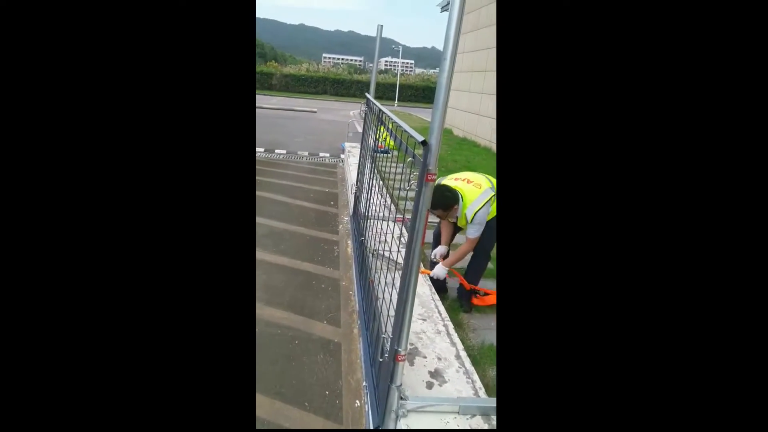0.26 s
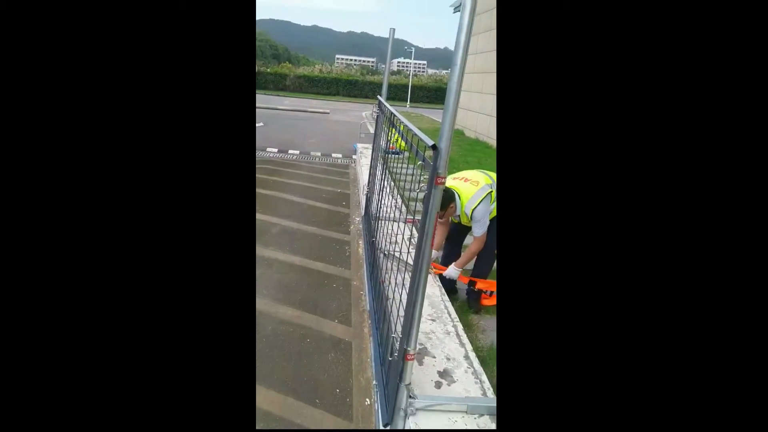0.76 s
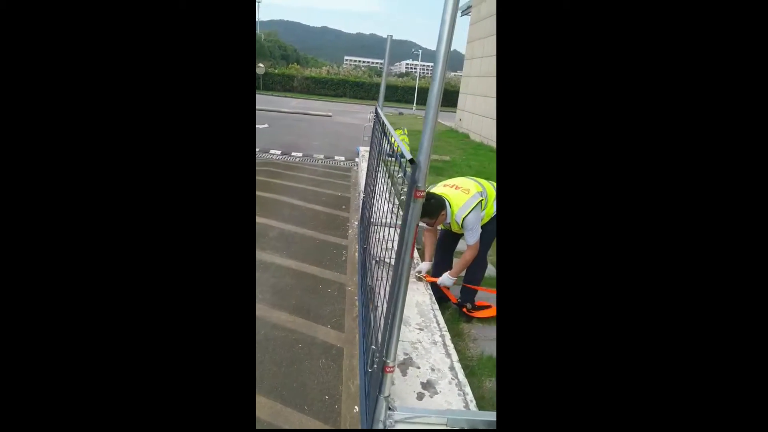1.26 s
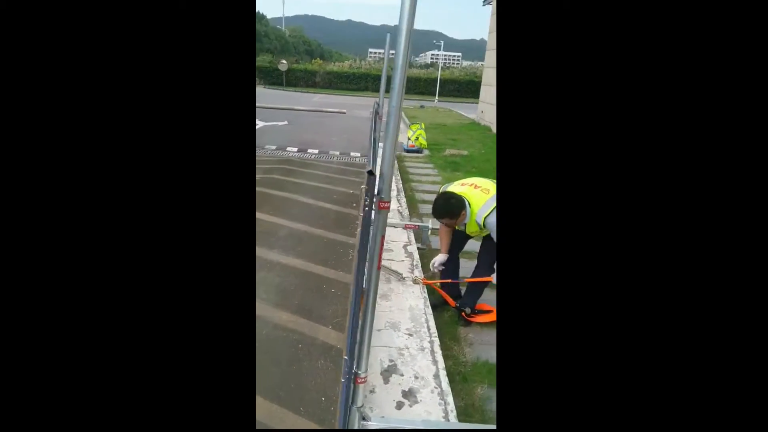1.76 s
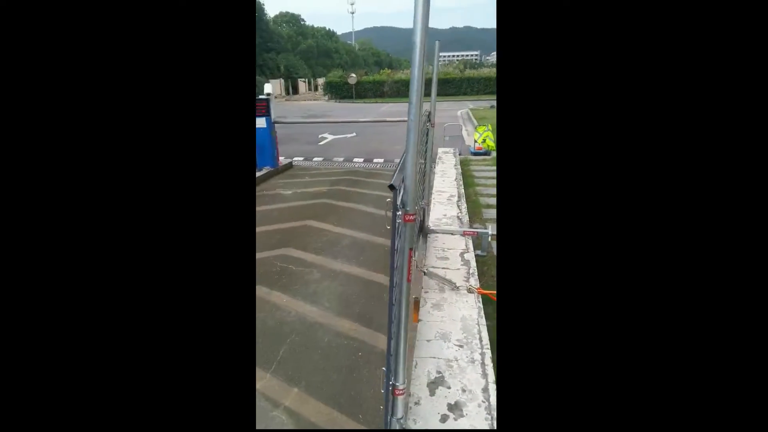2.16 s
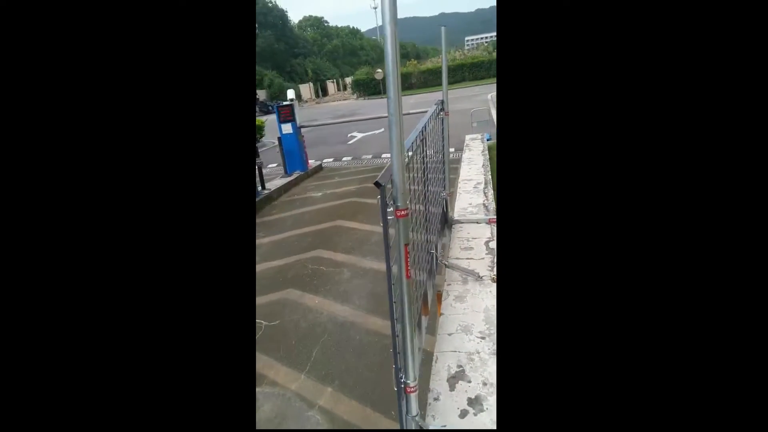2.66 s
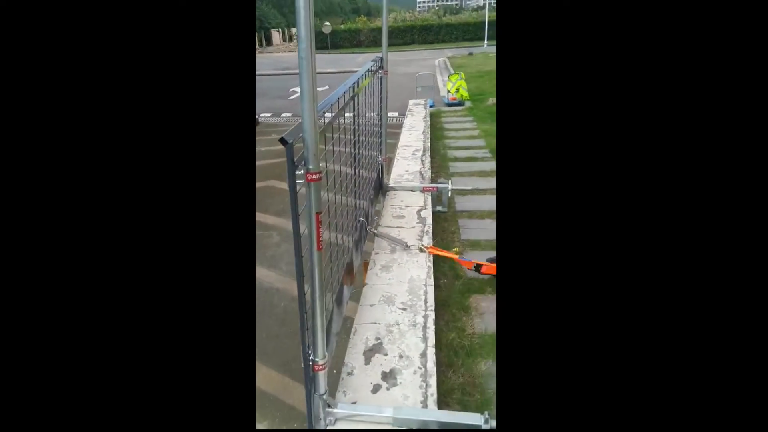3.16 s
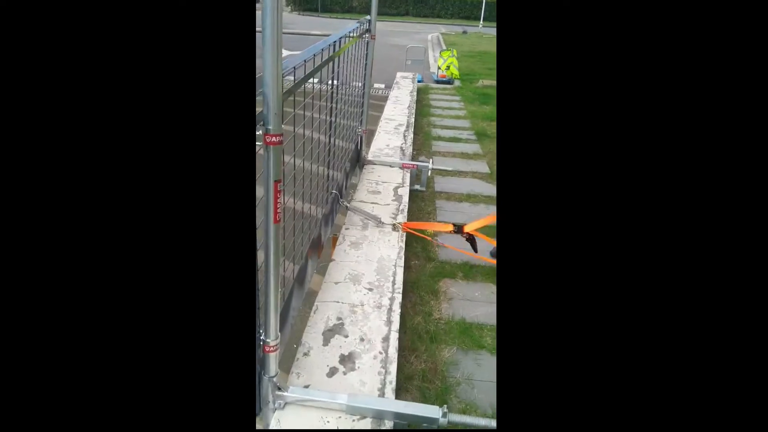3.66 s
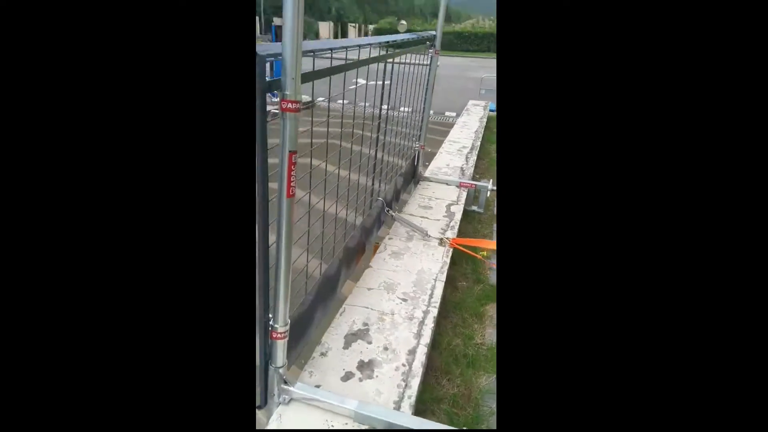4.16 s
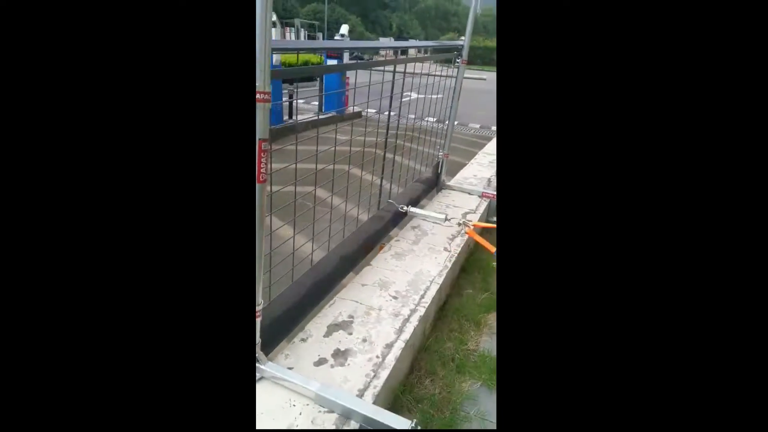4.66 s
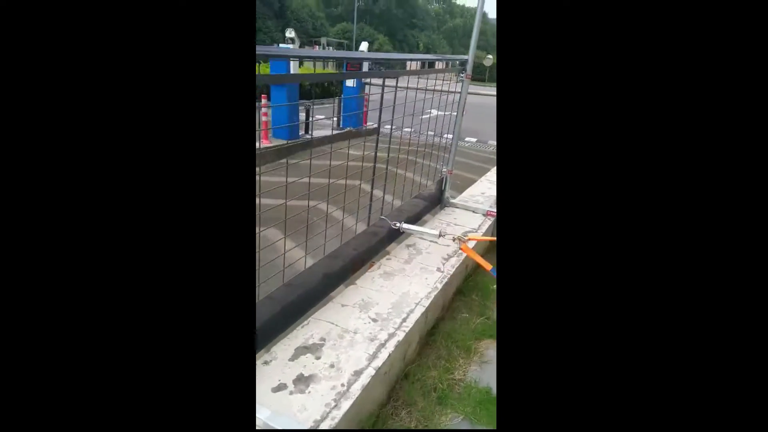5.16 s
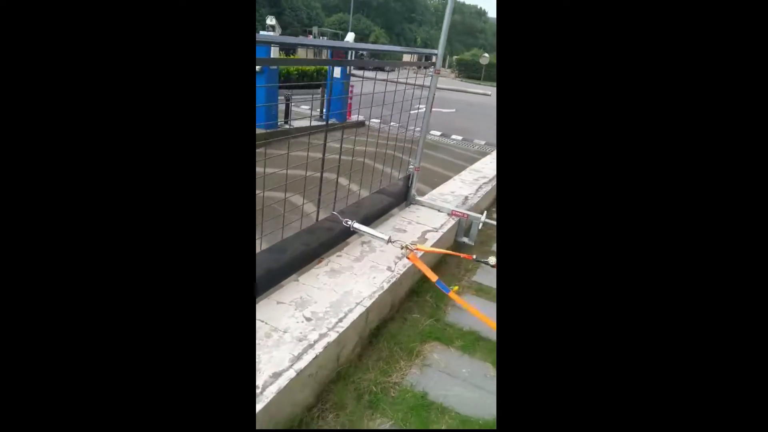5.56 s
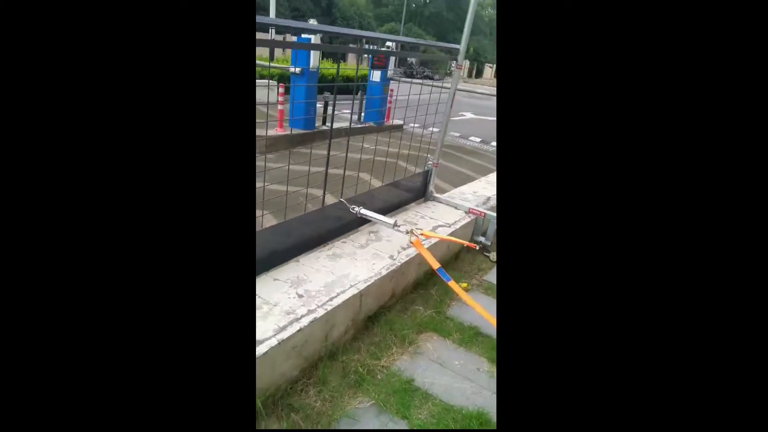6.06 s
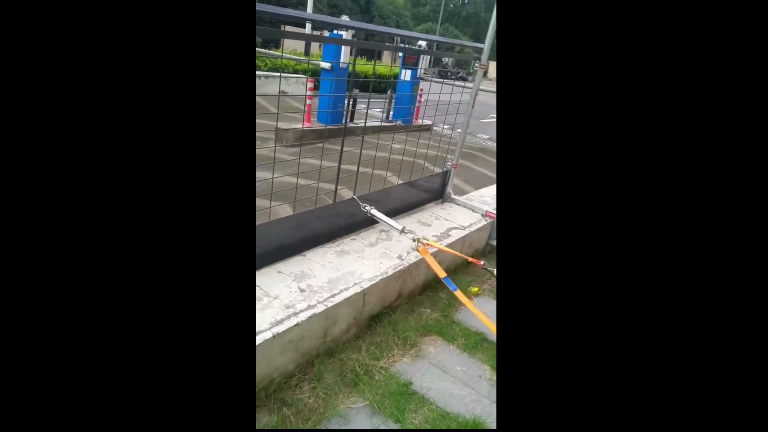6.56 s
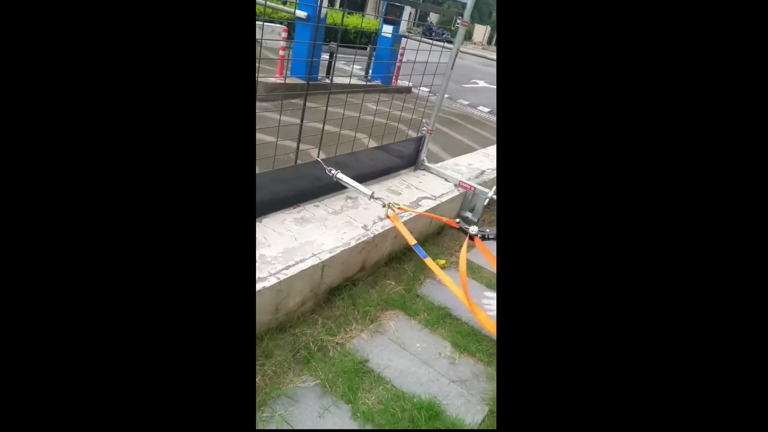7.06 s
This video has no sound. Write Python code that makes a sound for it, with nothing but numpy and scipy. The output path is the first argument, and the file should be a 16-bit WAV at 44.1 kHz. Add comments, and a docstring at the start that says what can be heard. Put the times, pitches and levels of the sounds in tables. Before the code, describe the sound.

Outdoors, booming wind gives way to one very loud metal ratchet clack, followed by light clinks, dull tube knocks, and rasping strap slides.

```python
"""Ratchet strap on a wire fence

A ratchet strap and its hooks are worked by hand against a wire fence outdoors, heard by a two-port microphone.
Steel blows are chattering contacts that ring clusters of modes and scatter; tubes and links give fading tones.
Webbing swishes as thin high noise with a rustle and ticking metal; grit scrapes as bands of bumpy noise.
Behind it lie lumpy low wind noise, single buffets on the right port and a faint, steady wash of far traffic."""
import sys
import numpy as np
from scipy import signal
from scipy.fft import rfft, irfft
from scipy.io import wavfile
from scipy.ndimage import uniform_filter1d

SR = 44100
rng = np.random.default_rng(int(sys.argv[2]) if len(sys.argv) > 2 else 0)


def generate_wav(sig):
    """Save sig (samples, or channels by samples) to the path in sys.argv[1] as 16-bit PCM at SR."""
    pcm = np.round(np.clip(np.atleast_2d(sig).T, -1, 1) * 32767).astype(np.int16)
    wavfile.write(sys.argv[1], SR, pcm)


N = 322795  # length in samples

# In all tables a positive left-right value favours the left; levels stand before panning.
# Far traffic: spectrum shape (frequency [Hz], relative level per Hz [dB])
TRAFFIC_SPECTRUM = [(12, -39.5), (20, -19), (49, 4.5), (79, -2), (182, -14.5), (356, -22), (922, -24.5),
                    (1710, -31.5), (2590, -39.5), (4290, -38.5), (5520, -44), (8390, -47), (11700, -50.5),
                    (13900, -77.5), (16000, -86)]
# Far traffic: likeness of the two ports (frequency [Hz], likeness [0 to 1])
TRAFFIC_LIKENESS = [(60, 1), (240, 0.99), (950, 0.51), (3770, 0.0), (15000, 0)]
# Far traffic: balance of the two ports (frequency [Hz], left-right [dB])
TRAFFIC_TILT = [(60, -0.5), (240, -3.5), (950, -5.5), (3770, -4), (15000, -0.5)]
TRAFFIC_DB = -51.5

# Wind: its underlying flow, joined by straight lines (time [s], level [dB], left-right [dB])
WIND_FLOW = [(0.0, -47, -28), (.04, -28, -30), (.32, -34, -33), (.5, -27, -37), (.57, -39, -35),
             (.8, -43.5, 7), (1.03, -32, -22), (1.18, -40.5, -12), (1.38, -49, -22), (1.67, -73, -5.5),
             (4.26, -62.5, 5.5), (4.38, -38, 9), (4.73, -38.5, 18), (4.82, -55.5, 14), (5.2, -61.5, 1.5),
             (5.48, -70, 18), (6.1, -48.5, -8), (6.3, -42.5, -20), (6.52, -46.5, 17), (6.82, -59.5, -9),
             (7.1, -46.5, -4.5), (7.32, -69, 1)]
# Wind: gusts on top of the flow (peak time [s], rise [s], fall [s], level [dB], left-right [dB])
GUSTS = [(0.241, 0.054, 0.22, -23, -33), (0.401, 0.021, 0.11, -38, -32), (0.609, 0.045, 0.11, -30, -30),
         (.88, 0.099, 0.16, -31, -13), (1.22, 0.07, 0.14, -24, -42), (1.429, 0.04, 0.14, -40, -9.5),
         (2.019, 0.076, 0.034, -42, -2), (2.14, 0.08, 0.17, -48.5, 26), (2.378, 0.074, 0.068, -45.5, -9),
         (2.53, .15, .1, -41, 8), (2.61, 0.092, 0.13, -44.5, -4), (2.85, 0.071, 0.19, -48.5, -2.5),
         (3.91, 0.1, 0.054, -44.5, -8.5), (4.459, 0.084, 0.073, -27, -19), (4.65, 0.075, 0.07, -35.5, 28.5),
         (5.3, .2, 0.14, -42.5, 5), (5.57, 0.078, 0.48, -43, -1), (6.219, 0.06, 0.066, -40, 14),
         (6.38, 0.19, 0.11, -29, -10), (6.63, 0.11, .05, -33.5, 1), (6.9, 0.047, 0.25, -28.5, -47.5)]
# Wind: spectrum shape (frequency [Hz], relative level per Hz [dB])
WIND_SPECTRUM = [(8.8, -53), (15, -31), (27, -56.5), (59, 17.5), (99, 4.5), (159, -0.5), (201, -15),
                 (300, -23), (427, -42), (600, -30.5), (780, -69.5), (1320, -120)]
# Wind: single buffets on the right port (time [s], level [dB], pitch [Hz], span [cycles])
BUFFETS = [(.006, -9.5, 94.4, 0.73), (0.096, -16.5, 127, 3.3), (0.248, -6.5, 94, 1.03),
           (0.349, -10, 108, 1.65), (0.44, -19.5, 213, 1.6), (0.501, -17, 75, 1.1),
           (0.867, -18.5, 115, 4.6), (1.213, -13, 216, 0.95), (1.229, -31, 88, 2.1),
           (6.281, -20, 102, 0.85), (6.378, -11, 90.7, 1.23), (6.911, -13.5, 98.3, 1.1),
           (6.999, -22.5, 99, 2.4)]

# Dull knocks in fence tubes (time [s], level [dB], pitch [Hz], left-right [dB], 60 dB decay [s])
TUBE_KNOCKS = [(0.363, -53.5, 608, -6, 0.13), (0.887, -50, 604, -14, 0.09), (1.115, -46.5, 898, -8.5, 0.19),
               (1.15, -51, 628, -9.5, 0.39), (1.903, -61, 608, -17.5, 0.27), (4.034, -62, 875, -10, 0.17),
               (4.16, -45.5, 1050, -19, 0.052), (4.366, -50.5, 861, -18.5, 0.39),
               (4.392, -52, 858, -15, 0.22), (4.509, -48.5, 1580, -19, .3), (4.515, -54.5, 1042, -14, 0.3),
               (4.887, -51, 627, -22, 0.21), (5.026, -52.5, 598, -14.5, 0.13), (5.185, -51, 1550, -20, 0.1),
               (5.555, -42.5, 1597, -14, 0.17), (5.185, -44, 830, -18, 0.079), (5.916, -61, 968, -11, 0.14),
               (6.663, -48, 617, -17, 0.2)]
# Light clinks of loose links (time [s], level [dB], lowest tone [Hz], its relative level [dB],
# second tone [Hz], its relative level [dB], left-right [dB], 60 dB decay [s])
CLINKS = [(0.0343, -50, 1540, -35, 3900, -32, -17, 0.32), (0.4902, -46, 1630, -33, 3700, -12, -21, 0.095),
          (1.234, -42.5, 2620, -24, 4120, -16, -17.5, 0.25),
          (3.246, -36.5, 2610, -15.5, 3840, -36, -16, 0.15),
          (3.8781, -58, 2200, -3.5, 4210, -17, -11.5, 0.093),
          (3.906, -63.5, 1890, -0.5, 4340, -21.5, -22.5, 0.24),
          (4.769, -36.5, 2670, -10.5, 3500, -23, -8, 0.16),
          (4.9309, -45.5, 2690, -8.5, 3930, -32, -15, 0.12), (5.089, -54, 2800, -5, 3400, -32, -23, 0.27),
          (5.1794, -49, 2320, -2, 4290, -13, -19, 0.13), (5.352, -32.5, 2870, -31, 3800, -39.5, -15, 0.074),
          (5.916, -43, 1566, -14, 4160, -8, -8, 0.14), (6.2987, -44, 2790, -23, 3890, -15, -25, 0.18)]
# Upper tones shared by all clinks (frequency [Hz], relative level [dB])
LINK_TONES = [(5620, -15.5), (6550, -20.5), (7400, -24), (8900, -21), (10450, -23)]

# Webbing slides (peak time [s], rise [s], fall [s], swish level [dB], left-right [dB],
# part above 12 kHz relative to the swish [dB], rustle level [dB])
SLIDES = [(1.858, .09, 0.072, -75.5, -3, -5, -99), (2.048, 0.02, 0.041, -72.5, -12, -1, -99),
          (2.26, 0.08, 0.1, -58.5, -13, 9, -99), (2.619, 0.068, 0.17, -68, -10, 11.5, -74),
          (3.056, 0.11, .1, -65, -19, -17, -99), (3.141, 0.091, 0.0023, -52, -11, -7, -99),
          (3.75, 0.21, 0.16, -83.5, -8, -3, -70), (3.95, 0.11, 0.11, -67, -15, 5.5, -86),
          (4.19, 0.15, 0.75, -58.5, -15, -0.5, -92.5), (4.49, 0.22, 0.14, -48.5, 0, -13, -61.5),
          (4.78, 0.013, 0.36, -66, -9, -2.5, -68), (5.17, 0.12, 0.38, -59, -17, -1, -59.5),
          (5.419, 0.23, 0.16, -60, 17.5, -22, -68), (5.53, .06, 0.25, -44, -14, -10, -57),
          (5.7, 0.45, 0.074, -51.5, -33, -16, -54.5), (5.84, 0.053, 0.19, -54.5, -22, 2.5, -89),
          (6.02, .15, .3, -55.5, -40.5, -19, -64.5), (6.27, 0.26, 0.14, -54, 2.5, -11, -71),
          (6.49, 0.17, .3, -57.5, -10, 3.5, -66), (6.661, 0.094, 0.19, -47.5, -10, 0, -57.5),
          (7.16, 0.57, 0.18, -67.5, -15, -3, -77.5)]
# Webbing: spectrum shape of the swish (frequency [Hz], relative level per Hz [dB])
WEBBING_SPECTRUM = [(4120, -45), (7000, -48.5), (7400, -9.5), (8150, -2), (8910, 2), (11700, 2),
                    (15100, -2.5), (16000, -9.5)]
RUSTLE_HZ, RUSTLE_WIDTH_HZ, RUSTLE_PAN_DB = 5804, 900, -19.5
RATTLE_PER_S, RATTLE_DB, RATTLE_T60_S = 260, -4.5, 0.1  # level is relative to the rustle
RATTLE_LOW_HZ, RATTLE_HIGH_HZ, RATTLE_VOICES = 1807, 6680, 12

# Scraping strokes (peak time [s], rise [s], fall [s], coarse grit level [dB],
# coarse grit centre [Hz], fine grit level [dB])
SCRAPES = [(4.171, .12, .1, -68.5, 2686, -81.5), (4.439, .1, .06, -69, 2696, -63),
           (4.501, .02, .16, -46, 2370, -32), (4.66, .15, .2, -49, 2456, -78),
           (4.769, .12, .14, -51.5, 2365, -60), (4.941, .05, .07, -65.5, 2646, -86),
           (5.12, .06, .12, -76, 2950, -69.5), (5.19, .06, .14, -58, 1956, -64),
           (5.37, .1, .09, -59, 2530, -77), (5.55, .05, .15, -45.5, 1764, -41),
           (5.69, .15, .08, -78.5, 1736, -59.5), (5.921, .15, .3, -73, 1556, -70),
           (6.1, .2, .2, -81, 1725, -72.5), (6.31, .08, .1, -80, 2750, -75),
           (6.551, .15, .15, -79.5, 1650, -69), (6.64, .015, .1, -44.5, 2473, -71),
           (6.681, .03, .1, -57.5, 2300, -42.5)]
# Fine grit: spectrum shape (frequency [Hz], relative level per Hz [dB])
FINE_GRIT_SPECTRUM = [(1530, -43), (2600, 3.5), (3200, -12.5), (3460, -1), (3980, 2.5), (4370, 7),
                      (6130, -8.5), (6940, 0), (9000, -14.5), (11700, -69), (19800, -120)]

# Mode clusters of the hook (centre [Hz], width before a floor of centre/14 [Hz], relative level [dB])
HOOK_MODES = [(2495, 196, -16.5), (3470, 320, -8), (3740, 240, -20.5), (5060, 710, 1), (6260, 430, -24),
              (7160, 800, 8.5), (9400, 470, -1.5), (11300, 460, -4.5), (12200, 850, -26), (13800, 900, -21)]
# Mode clusters of the ratchet (centre [Hz], width before the same floor [Hz], relative level [dB])
RATCHET_MODES = [(1442, 500, -26.5), (2027, 150, -18.5), (2987, 140, -20), (3780, 230, -11.5),
                 (4560, 170, -19), (5620, 170, -19), (7420, 500, -7), (8300, 400, -8), (9100, 500, 0.5),
                 (10230, 600, -0.5), (11980, 700, -4.5), (13200, 500, -9.5), (13280, 830, -9.5),
                 (13450, 600, -3.5)]
# Mode clusters of the wire fence (centre [Hz], width before the same floor [Hz], relative level [dB])
FENCE_MODES = [(659, 300, -19.5), (860, 63, -34), (1508, 83, -20.5), (2400, 390, 0.5), (3280, 620, -2.5),
               (4060, 570, 2), (5840, 690, 4.5), (6220, 1900, 4.5), (8370, 870, 8), (10250, 280, 0),
               (12830, 900, 5.5)]
# Mode clusters of the kick panel (centre [Hz], width before the same floor [Hz], relative level [dB])
PANEL_MODES = [(1086, 89, -8), (1545, 153, -19), (2182, 110, 5), (2946, 500, -2.5), (3330, 100, 4.5),
               (4170, 640, -6), (5240, 2000, 2), (6180, 520, -19), (6700, 1100, 12), (7900, 1200, -27)]
# Blows on the hook (time [s], level [dB], left-right [dB], colour at 1.6 kHz [dB],
# colour at 12 kHz [dB], chatter [s], echo relative to direct [dB])
HOOK_BLOWS = [(.639, -26, -6.5, 2.5, -4.5, 0.03, -12.5)]
# Blows on the ratchet (time [s], level [dB], left-right [dB], colour at 1.6 kHz [dB],
# colour at 12 kHz [dB], chatter [s], echo relative to direct [dB])
RATCHET_BLOWS = [(0.625, -41.5, -9, -5, 1.5, 0.0057, 9), (2.0405, -54, -8.0, -2, -10, 0.012, -12),
                 (3.1467, -19, -8, -13, -9, 0.0073, -7), (3.248, -29, -4, -6, 0, 0.0027, -17),
                 (3.296, -42.5, -8, -11, 5, 0.011, 7), (3.3303, -1, -4, -6.5, 2.5, 0.0086, -7.5),
                 (3.5055, -26.5, -6, -11.5, -15.5, 0.018, -16.5), (4.7694, -33, -8.5, 4, -6, 0.01, -11),
                 (4.9317, -43.5, -13, -28, -20, 0.0067, -18), (6.4887, -69, -11.5, -3, 15, 0.017, -10)]
# Blows on the fence (time [s], level [dB], left-right [dB], colour at 1.6 kHz [dB],
# colour at 12 kHz [dB], chatter [s], echo relative to direct [dB])
FENCE_BLOWS = [(1.083, -32.5, -17, 8, 3, 0.05, -5), (1.108, -11, -8, 0, 0, 0.012, -6.5),
               (1.233, -34.5, -4, -10, -4, 0.0056, -11), (4.159, -47, -15.5, 25, -10, 0.0059, -9),
               (5.103, -44.5, -22.5, -8, -17, 0.031, 9), (6.299, -48, -14, -13, -25, 0.0063, 0)]
# Blows on the kick panel (time [s], level [dB], left-right [dB], colour at 1.6 kHz [dB],
# colour at 12 kHz [dB], chatter [s], echo relative to direct [dB])
PANEL_BLOWS = [(4.4277, -42, -13, -4, 1, 0.014, -17.5), (4.499, -21.5, -4.5, -3, -24, 0.015, 7),
               (4.6944, -36, -10.5, -6, -45, 0.035, -12), (5.1793, -46, -25, 12, -18, 0.013, 6),
               (5.5199, -44, -29, -19, 12, 0.015, 1), (6.634, -33.5, -3.5, -2, -33, 0.028, -14)]
CREST_DB = 13.5  # a blow's loudest short rms sits this far under its level
CLEAR_WIDTH_HZ = 64
LINGER_TIMES = 3.5  # the clear mode at the centre of a cluster rings this much longer than the rest


def gain_of(db):
    """Turns decibels into amplitude."""
    return 10 ** (np.asarray(db) / 20)


def evened(x):
    """Scales to rms 1 over all channels together."""
    return x / np.sqrt(np.mean(x ** 2) + 1e-20)


def read(points, hz):
    """Reads a table by straight lines on a log-frequency axis."""
    f, value = np.transpose(points)
    return np.interp(np.log(hz + 1), np.log(f + 1), value)


def curve(rows, column):
    """Draws one column of a timed table at every sample."""
    rows = np.array(rows)
    return np.interp(np.arange(N) / SR, rows[:, 0], rows[:, column])


def sides(db):
    """Left and right gains for a left-right difference, with the summed power held."""
    ratio = gain_of(db)
    return 2 * np.array([ratio, np.ones_like(ratio)]) / np.sqrt(1 + ratio ** 2)


def add(mix, s, sound):
    """Mixes a sound in at a time in seconds."""
    part = mix[:, round(max(s, 0) * SR):][:, :sound.shape[1]]
    part += sound[:, :part.shape[1]]


def hiss(spectrum, likeness, drift_db, size, tilt_db=0):
    """Two-channel noise of rms 1 with a spectrum, a left-right likeness and a random drift of level."""
    hz = np.fft.rfftfreq(size, 1 / SR)
    frames = N // (size // 4) + 5
    a, b, c, d, drift = rng.standard_normal((frames, len(hz), 5)).T
    drift = uniform_filter1d(drift, size=3, axis=0)  # across frequency
    drift = evened(uniform_filter1d(drift, size=14, axis=1))  # across time
    same = np.clip(read(likeness, hz), -1, 1)[:, None]
    left = a + 1j * b
    right = same * left + np.sqrt(1 - same ** 2) * (c + 1j * d)
    z = np.array([left, right]) * gain_of(read(spectrum, hz)[:, None] + drift_db * drift)
    z[0] *= gain_of(read(TRAFFIC_TILT, hz) * tilt_db)[:, None]
    return evened(signal.istft(z, nperseg=size, noverlap=size * 3 // 4)[1][:, :N])


def band(hz, width, shape):
    """Noise of rms 1 in a steep band around a fixed or moving centre."""
    z = rng.standard_normal(shape) + 1j * rng.standard_normal(shape)
    z = signal.lfilter(*signal.butter(3, min(width / SR, .5)), z)
    phase = 2 * np.pi * np.cumsum(hz * np.ones(shape[-1])) / SR
    return evened((z * np.exp(1j * phase)).real)


def note(hz, db, t60, rough, rise_s):
    """One dying tone whose level wavers separately at each port."""
    t = np.arange(SR // 4) / SR
    waver = 1 + rough * evened(uniform_filter1d(rng.standard_normal((2, len(t))), size=250))
    fade = gain_of(db - 60 * t / max(t60, .02)) * np.minimum(t / rise_s, 1)
    return waver * np.sin(2 * np.pi * hz * t) * fade


def swells(rows):
    """Power of each stroke over time: it gains 20 dB in its rise time and loses 20 dB in its fall time."""
    peak, rise, fall = np.array(rows).T[:3, :, None]
    t = np.arange(0, N, 32) / SR - peak
    return gain_of(-20 * np.maximum(-t / np.maximum(rise, .003), t / np.maximum(fall, .003))) ** 2


def heard(gains, power):
    """Amplitude at every sample when the strokes add in power, each with its own gain."""
    level = np.sqrt(np.atleast_2d(gains) ** 2 @ power)
    return np.repeat(level, 32, axis=1)[:, :N]


def grit(per_s, spread_db):
    """Uneven pressure of rubbing: short bumps of random size over a constant push."""
    size = gain_of(spread_db * np.minimum(rng.exponential(1, N), 3))
    bumps = size * (rng.random(N) < per_s / SR)
    return evened(6.3 * bumps.mean() + uniform_filter1d(bumps, size=40))


def traffic():
    """Far traffic blends into a faint wash, alike at both ports in the bass and unlike in the treble."""
    return gain_of(TRAFFIC_DB) * hiss(TRAFFIC_SPECTRUM, TRAFFIC_LIKENESS, 2.05, size=2048, tilt_db=1)


def buffets():
    """Each buffet of wind pushes the right port through a short, windowed swing of pressure."""
    out = np.zeros((2, N))
    for s, db, hz, cycles in BUFFETS:
        start = max(s - .05, 0)
        turns = (start - s + np.arange(SR // 10) / SR) * hz
        puff = np.sin(2 * np.pi * (.12 - turns)) * np.exp(-(2.27 * turns / max(cycles, .3)) ** 2)
        add(out[1:], start, gain_of(db) * puff[None])
    return out


def wind():
    """Low turbulent pressure, partly shared by the ports, is lumpy and swells with flow and gusts."""
    lumps = uniform_filter1d(rng.standard_normal((2, N)), size=500)
    lumps = gain_of(3.5 * evened(uniform_filter1d(lumps, size=500)))
    noise = evened(hiss(WIND_SPECTRUM, [(20, 0.6), (600, 0.3)], 0.38, size=2048) * lumps)
    flow = gain_of(curve(WIND_FLOW, column=1)) * sides(curve(WIND_FLOW, column=2))
    db, pan_db = np.array(GUSTS).T[3:]
    gusts = heard(gain_of(db) * sides(pan_db), swells(GUSTS))
    return noise * np.hypot(flow, gusts) + buffets()


def tube_knocks():
    """A knocked fence tube answers with one dull, wavering note."""
    out = np.zeros((2, N))
    for s, db, hz, pan_db, t60 in TUBE_KNOCKS:
        add(out, s, note(hz, db, t60, rough=0.86, rise_s=0.0092) * sides(pan_db)[:, None])
    return out


def clinks():
    """A loose link answers with a noisy tick and a stack of fading tones."""
    out = np.zeros((2, N))
    for s, db, low_hz, low_db, mid_hz, mid_db, pan_db, t60 in CLINKS:
        tones = [(low_hz, low_db), (mid_hz, mid_db)] + list(LINK_TONES)
        clink = sum(note(hz, db + rel, t60, rough=0.9, rise_s=.0015) for hz, rel in tones)
        t = np.arange(clink.shape[1]) / SR
        tick = band(6000, 7000, clink.shape) * gain_of(db - 26 - 60 * t / 0.043)
        add(out, s, (clink + tick) * sides(pan_db)[:, None])
    return out


def rattle():
    """Loose metal jiggles: sparse tiny ticks, each ringing one short rough tone."""
    t, out = np.arange(SR // 10) / SR, np.zeros((2, N))
    pitches = np.geomspace(RATTLE_LOW_HZ, RATTLE_HIGH_HZ, num=RATTLE_VOICES)
    for hz in pitches * rng.uniform(.95, 1.05, size=RATTLE_VOICES):
        size = gain_of(2.5 * np.minimum(rng.exponential(1, N), 3))
        ticks = size * (rng.random(N) < RATTLE_PER_S / RATTLE_VOICES / SR)
        fade = gain_of(-60 * t / RATTLE_T60_S) * np.minimum(t * 500, 1)
        tone = band(hz, CLEAR_WIDTH_HZ * 2, (2, len(t))) * fade
        out += signal.oaconvolve(ticks[None], tone, axes=1)[:, :N]
    return gain_of(RATTLE_DB) * evened(out)


def webbing():
    """The strap slides with a thin, high swish and a narrow rustle, and shakes loose metal."""
    noise = hiss(WEBBING_SPECTRUM, [(5000, .1), (15000, 0.075)], 3.5, size=512) * grit(4000, 2.5)
    top = signal.sosfiltfilt(signal.butter(4, 12000, "high", fs=SR, output="sos"), noise)
    power = swells(SLIDES)
    db, pan_db, top_db, rustle_db = np.array(SLIDES).T[3:]
    swish = (noise - top) * heard(gain_of(db) * sides(pan_db), power)
    swish = swish + top * heard(gain_of(db + top_db) * sides(pan_db), power)
    rustle = band(RUSTLE_HZ, RUSTLE_WIDTH_HZ, (2, N)) + rattle()
    return swish + rustle * sides(RUSTLE_PAN_DB)[:, None] * heard(gain_of(rustle_db), power)


def scraping():
    """Coarse and fine grit rub under one uneven pressure, nearer the right port."""
    power = swells(SCRAPES)
    coarse_db, hz, fine_db = np.array(SCRAPES).T[3:]
    coarse_level = heard(gain_of(coarse_db), power)
    # power-weighted mean of the centres, so the loudest stroke leads
    centre = (heard(gain_of(coarse_db) * np.sqrt(hz), power) / (coarse_level + 1e-30))[0] ** 2
    coarse = coarse_level * band(centre, 690, (2, N)) * sides(-14.5)[:, None]
    fine = hiss(FINE_GRIT_SPECTRUM, [(1000, 0.45), (4000, 0.072)], 3, size=512)
    fine = heard(gain_of(fine_db), power) * fine * sides(-15.5)[:, None]
    return grit(1400, 1.8) * (coarse + fine)


def ring(clusters, crack_db, clear_db, t60):
    """Impulse response of a steel part at each port: dense clusters of modes over a short broad crack."""
    t = np.arange(SR // 4) / SR
    out = gain_of(crack_db - 60 * t / 0.02) * rng.standard_normal((2, len(t)))
    for hz, width, db in clusters:
        fade = gain_of(-60 * t / t60 * (hz / 5000) ** 0.5)  # high modes die sooner
        cluster = fade * band(hz, max(width, hz / 14), out.shape)
        clear = gain_of(clear_db) * fade ** (1 / LINGER_TIMES) * band(hz, CLEAR_WIDTH_HZ, out.shape)
        out = out + gain_of(db) * (cluster + clear)
    return out


def echoes(t60):
    """Dense scatter from fence, kerb and wall, different at each port; treble dies first."""
    t = np.arange(SR // 2) / SR
    noise = rng.standard_normal((2, 2, len(t))) * np.minimum(t / 0.0057, 1)
    dull = signal.lfilter([.45], [1, -.55], noise[0]) * gain_of(-60 * t / t60)
    tail = dull + 0.56 * noise[1] * gain_of(-60 * t / (.5 * t60))
    return tail / np.linalg.norm(tail[0])


def blows(rows, clusters, crack_db, clear_db, ring_t60, echo_t60, size):
    """Each blow is a chatter of tiny contacts that rings the part, then scatters."""
    out, t = np.zeros((2, N)), np.arange(SR // 8) / SR
    length = 2 ** 15
    hz = np.fft.rfftfreq(length, 1 / SR)
    for s, db, pan_db, low_db, high_db, chatter, echo_db in rows:
        u = t / max(chatter, .001)
        contacts = rng.standard_normal(len(t)) * (rng.random(len(t)) < 4000 / SR)
        contacts *= np.minimum(0.12 + u / 1.8, 1) * np.exp(-u ** 2)
        body = ring(clusters, crack_db, clear_db, ring_t60)  # another spot is struck each time
        colour = gain_of(read([(400, low_db - 24.0), (1000, low_db - 7), (1600, low_db), (5000, 0.008),
                               (12000, high_db), (16000, 2 * high_db - 7.0)], hz))
        direct = rfft(contacts, length) * rfft(body, length)
        # the scatter gathers sound sent in all directions, so holes narrower than size bins fill up
        gathered = np.sqrt(abs(uniform_filter1d(abs(direct) ** 2, size=size)))
        delay = np.exp(-2j * np.pi * hz * .6 * chatter)
        late = gain_of(echo_db) * gathered * rfft(echoes(echo_t60), length) * delay
        both = irfft((direct + late) * colour, length)[:, :SR * 2 // 3]
        loudest = np.sqrt(uniform_filter1d(both ** 2, size=600).max(axis=1, keepdims=True))
        add(out, s, gain_of(db - CREST_DB) * both / loudest * sides(pan_db)[:, None])
    return out


def steel():
    """Hook, ratchet, fence and kick panel are struck, each with its own ring and scatter."""
    hook = blows(HOOK_BLOWS, HOOK_MODES, crack_db=1, clear_db=-41, ring_t60=0.34, echo_t60=0.4, size=150)
    ratchet = blows(RATCHET_BLOWS, RATCHET_MODES, crack_db=9.3, clear_db=-13, ring_t60=0.092,
                    echo_t60=0.4, size=900)
    fence = blows(FENCE_BLOWS, FENCE_MODES, crack_db=-5.0, clear_db=-11, ring_t60=0.029,
                  echo_t60=0.32, size=1100)
    panel = blows(PANEL_BLOWS, PANEL_MODES, crack_db=3, clear_db=-7, ring_t60=0.033, echo_t60=0.67, size=250)
    return hook + ratchet + fence + panel


def scene():
    """Sums all sources, from the far wash to the steel."""
    return traffic() + wind() + tube_knocks() + clinks() + webbing() + scraping() + steel()


def record(dry):
    """Bass cut of the microphone, full-scale clipping, then the band limit."""
    cut_hz, edge_hz = 45, 16050
    thin = signal.sosfilt(signal.butter(2, cut_hz, "high", fs=SR, output="sos"), dry)
    limit = signal.firwin(511, edge_hz, window=("kaiser", 9), fs=SR)
    return signal.oaconvolve(np.clip(thin, -1, 1), limit[None], "same")


dry = scene()
out = record(dry)
generate_wav(out)
```